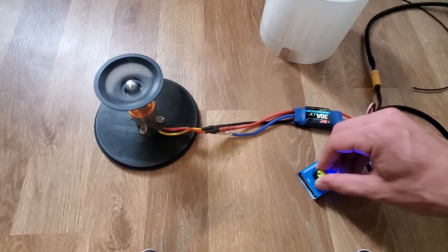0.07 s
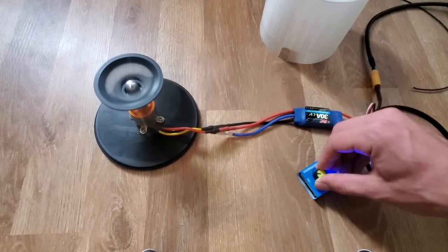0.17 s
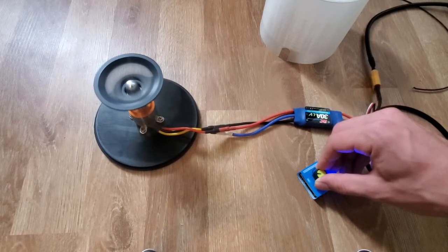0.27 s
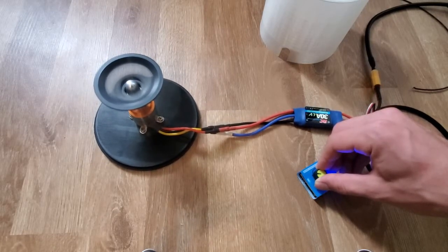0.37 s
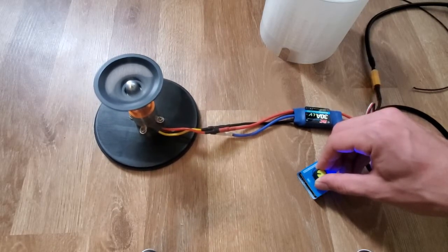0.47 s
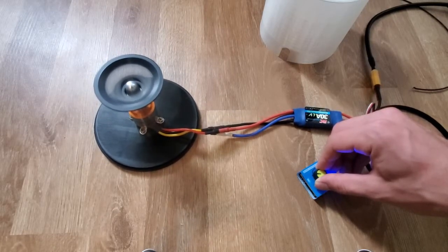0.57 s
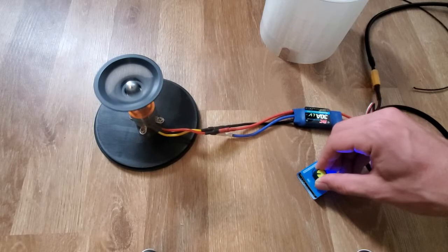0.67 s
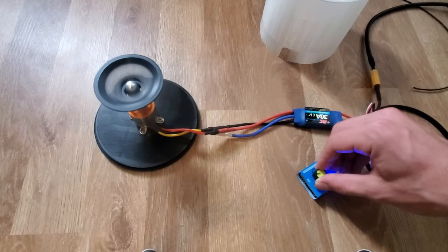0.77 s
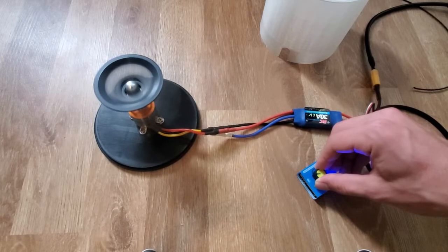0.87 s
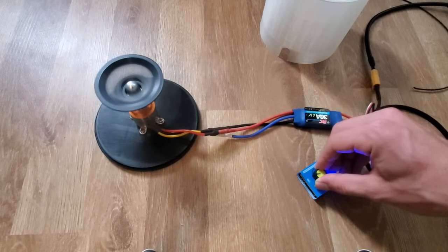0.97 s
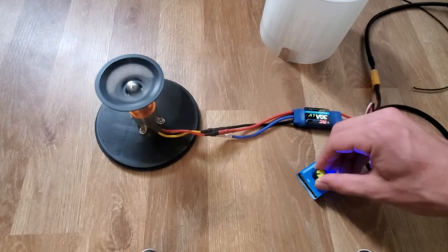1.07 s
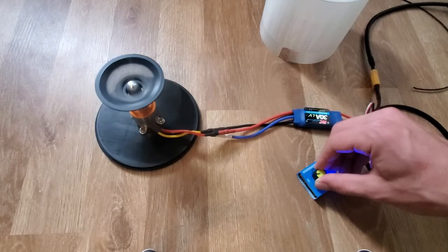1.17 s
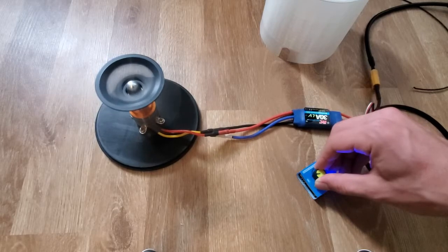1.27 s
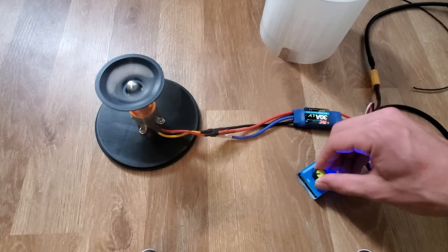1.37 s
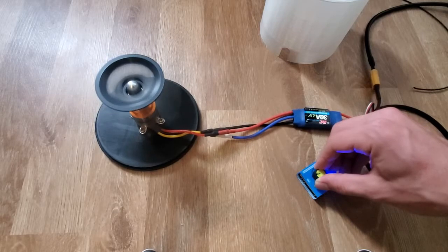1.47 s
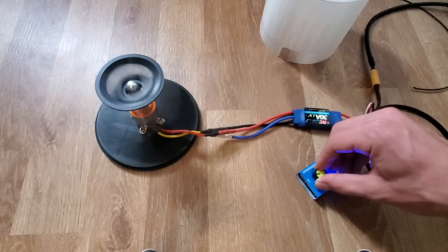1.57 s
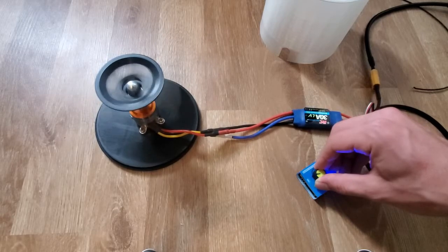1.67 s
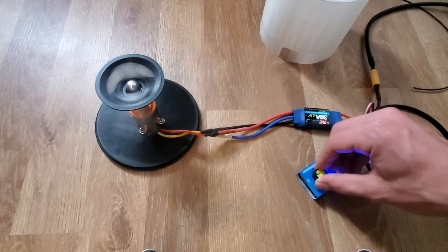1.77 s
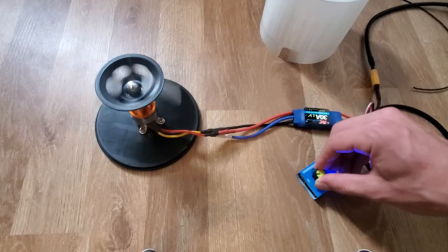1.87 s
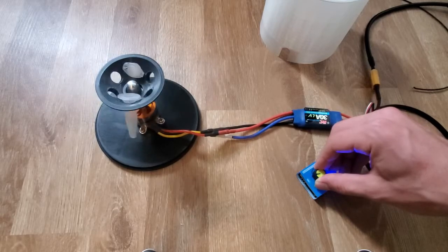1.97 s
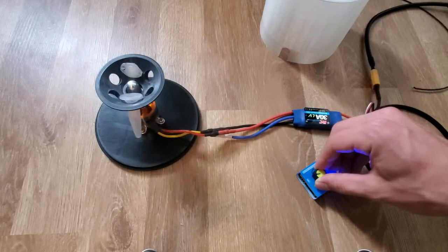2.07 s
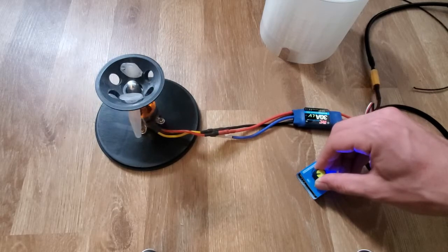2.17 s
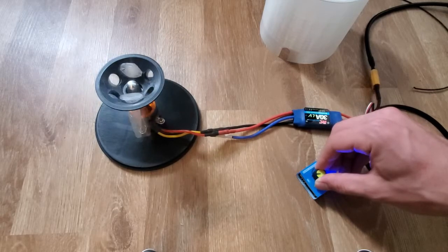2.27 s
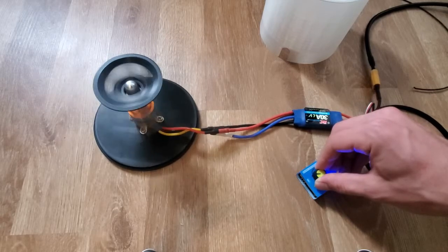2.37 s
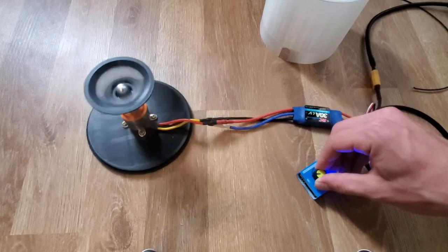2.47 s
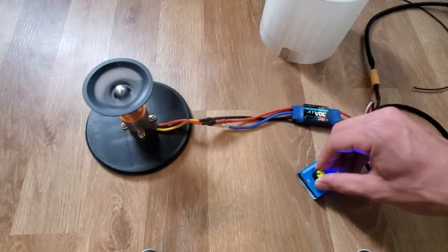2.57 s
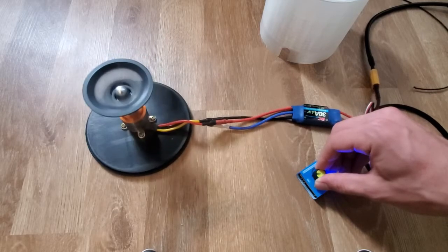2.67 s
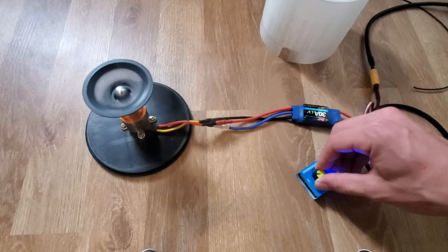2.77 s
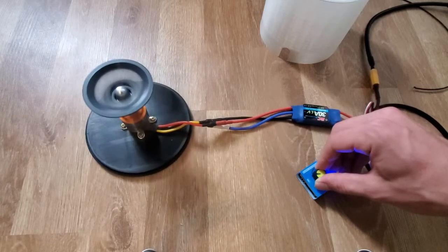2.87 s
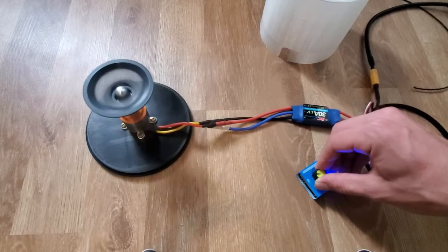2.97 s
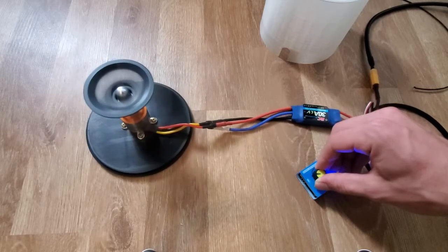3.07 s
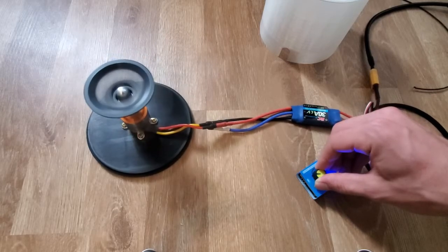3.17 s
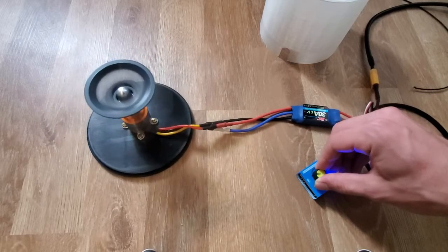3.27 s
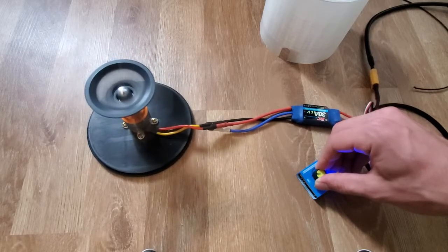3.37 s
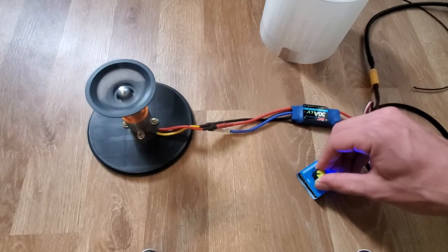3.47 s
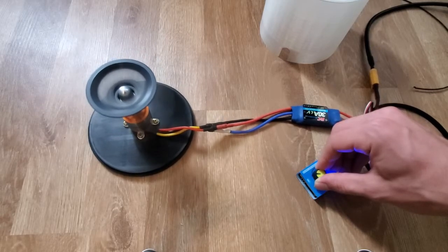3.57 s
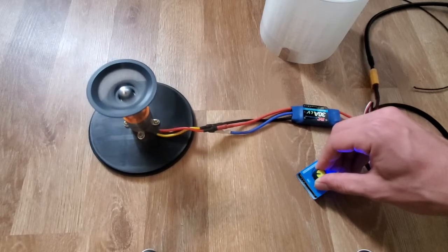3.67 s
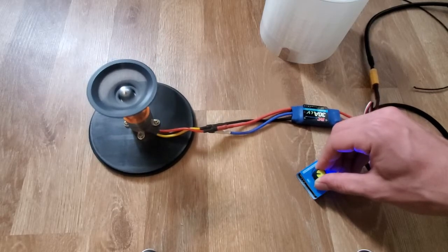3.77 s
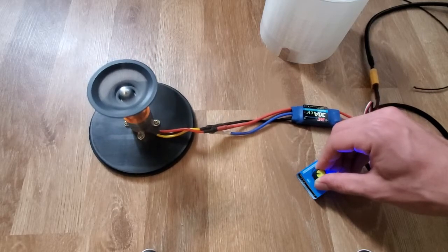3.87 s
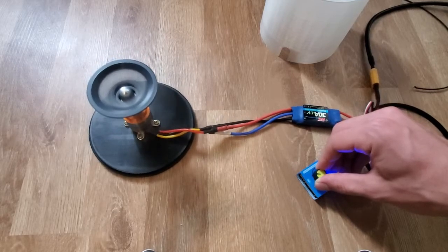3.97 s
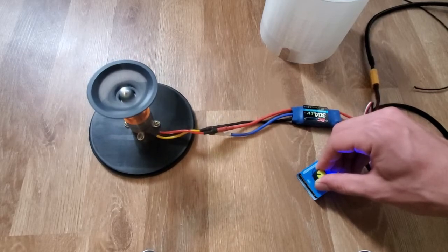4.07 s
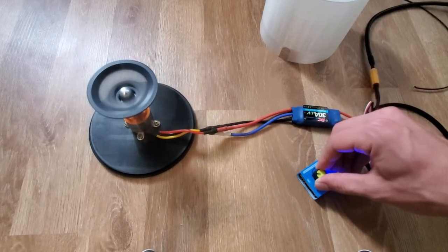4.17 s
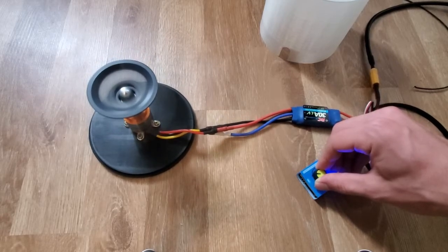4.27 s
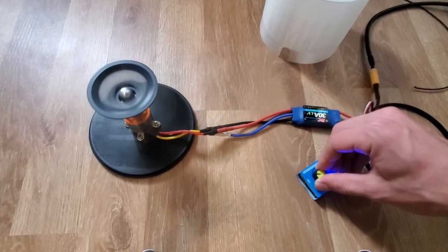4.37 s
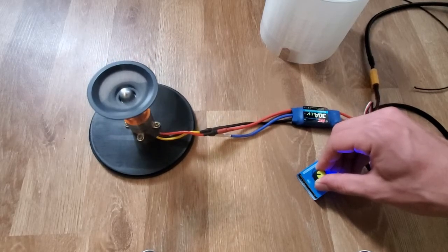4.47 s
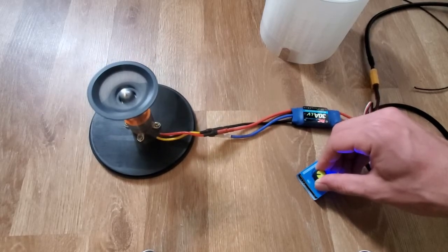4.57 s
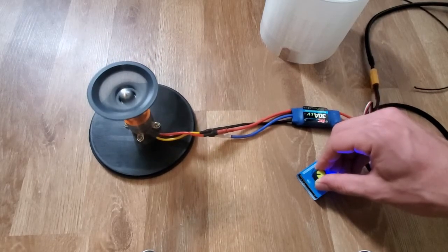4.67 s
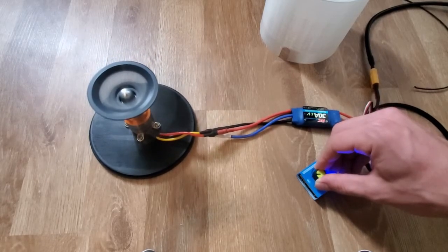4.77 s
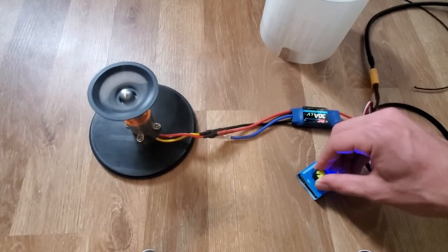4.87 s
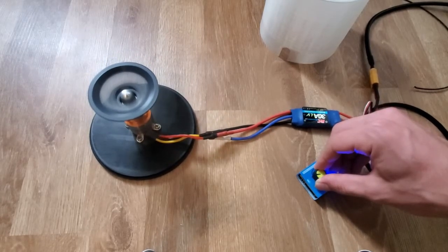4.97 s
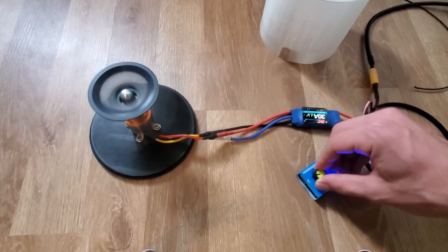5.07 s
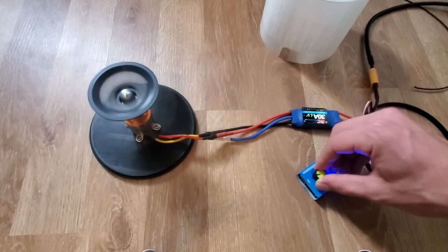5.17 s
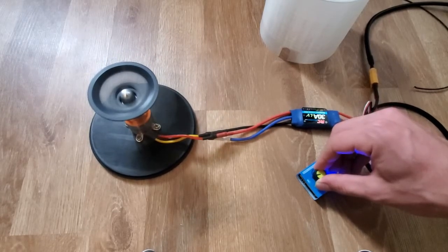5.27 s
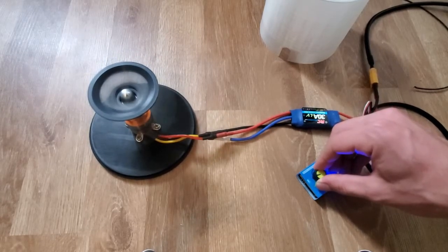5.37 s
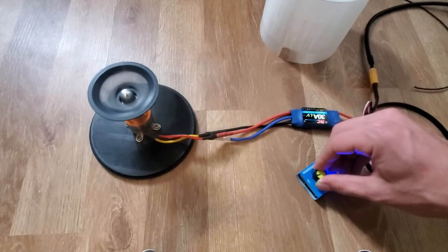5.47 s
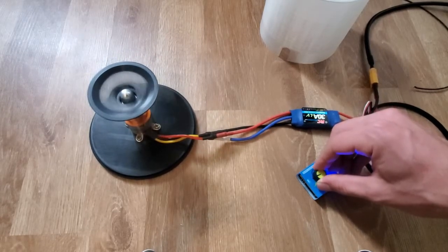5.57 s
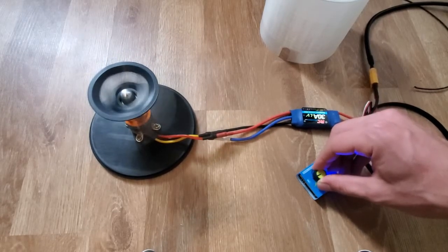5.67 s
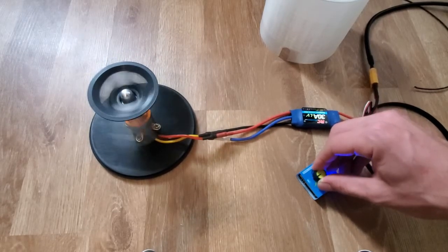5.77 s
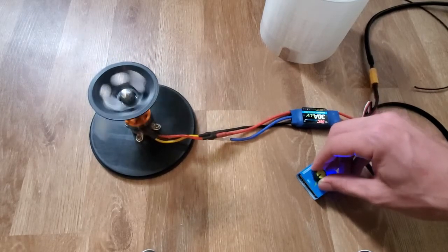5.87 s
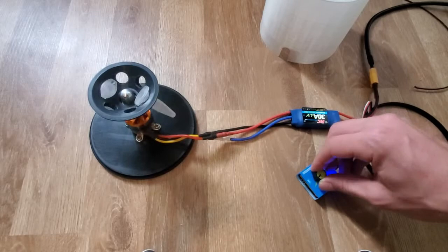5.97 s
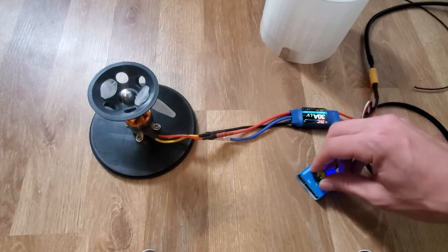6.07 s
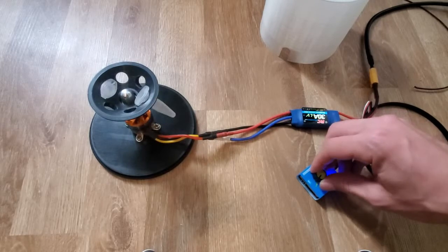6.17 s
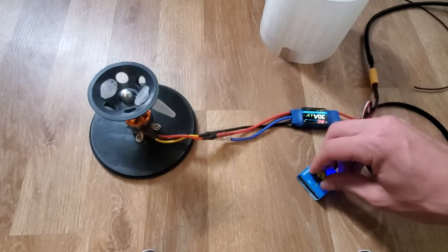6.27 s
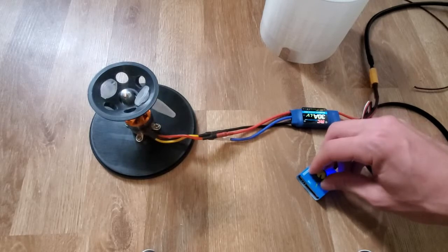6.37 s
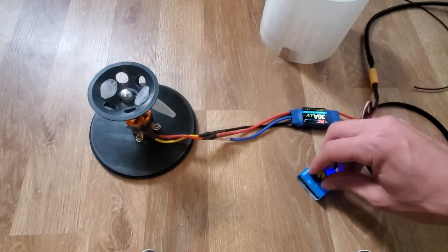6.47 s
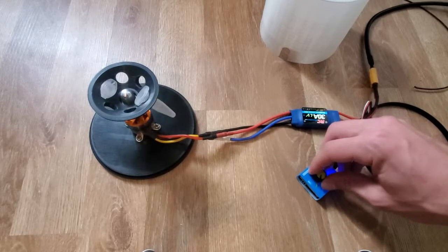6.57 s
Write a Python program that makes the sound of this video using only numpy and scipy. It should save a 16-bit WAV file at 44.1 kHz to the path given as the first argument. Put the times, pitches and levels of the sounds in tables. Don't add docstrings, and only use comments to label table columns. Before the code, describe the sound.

From 0 s a small motor is running fast on a wooden floor: a bright metallic whirr with singing bearing tones, a low unbalance hum, and a loose plastic foot rattling the boards at nearly two hundred strikes a second. A thin electronic whistle near 8 kHz, with a fainter one an octave up, rides above. The pitch eases slightly; at about 0.9 s the whistle cuts, the rattle stumbles out by 1.1 s, and the whirr slides down, duller and softer, nearly to rest by 2.2 s. At 2.3 s a harsh ringing buzz with scattered knocks kicks it back to life. From 2.6 s the whine climbs, fairly clean, with rattle returning around 3.5 s and growing strong by 4.3 s. Power stops near 4.85 s, rattling breaks up by 5.1 s, and the motor coasts down, fading into low room rumble. Left side is louder and brighter.

```python
import sys
import numpy as np
from scipy import signal
from scipy.fft import rfft, irfft, next_fast_len
from scipy.io import wavfile
from scipy.ndimage import uniform_filter1d

SR = 44100
rng = np.random.default_rng(int(sys.argv[2]) if len(sys.argv) > 2 else 0)


def master_out(mix):
    frames = np.transpose(np.atleast_2d(mix))
    ceiling = np.clip(frames, -1, 1)
    pcm = np.round(ceiling * 32767).astype(np.int16)
    wavfile.write(sys.argv[1], SR, pcm)


def level_to_linear(level):
    exponent = np.asarray(level, float) / 20
    return 10 ** exponent


N = 291942
T = np.arange(N) / SR

# [start_s, strength_db]
HOPS = [
    [(0, -23), (.24, -23), (.54, -28.5), (.57, -25), (.95, -27.5), (1.01, -40.5), (1.1, -53.5)],
    [(2.3, -89), (2.32, -40), (2.39, -53.5), (2.41, -33), (2.49, -32), (2.56, -63.5)],
    [(2.77, -41.5), (3.5, -33.5), (3.53, -30), (3.88, -26), (4.3, -24.5), (4.4, -25.5), (4.98, -27.5),
     (5.03, -40), (5.12, -64.5)],
]
# [on_s, blind_end_s, off_s]
POWERED = [
    (-1, -1, .94),
    (2.303, 2.562, 4.85),
]
# [speed_turns_per_s, unbalance_hum_db, magnet_cogging_db, clean_order_share_0_to_1]
SHAKE = [(0, -95, -93, .08), (9.9, -71.5, -56.5, .08), (30.4, -72, -45.5, .08), (55, -72.5, -40, .12),
         (78.2, -57, -39, .25), (96.8, -61, -33, .4), (135, -51, -37, .68), (155, -41, -34.5, .9),
         (163, -37.5, -51.5, .96), (210, -36, -60, .96)]


def evened(x):
    return x / np.sqrt(np.mean(x ** 2) + 1e-20)


def read(points, hz):
    f, value = np.transpose(points)
    return np.interp(np.log(hz + 1), np.log(f + 1), value)


def curve(rows, column, off=-120., t=T):
    rows = np.array(rows)
    return np.interp(t, rows[:, 0], rows[:, column], off, off)


def spells(tables, column, off=-120.):
    return np.max([curve(rows, column, off) for rows in tables], axis=0)


def between(start_s, end_s):
    return (T > start_s) & (T < end_s)


def bumps(modes, hz):
    return sum(db / (1 + (2 * (hz - f) / width) ** 2) for f, width, db in modes)


def wander(hz):
    return evened(signal.sosfilt(signal.butter(2, hz, fs=SR, output="sos"), rng.standard_normal(N)))


FLUTTER = wander(hz=9)


def line(angle_turns, flutter_db):
    flutter = level_to_linear(flutter_db * np.roll(FLUTTER, rng.integers(N)))
    return np.sqrt(2) * np.sin(2 * np.pi * (angle_turns + rng.random())) * flutter


def shaped_noise(shape_db, patchy_db):
    frames = N // 128 + 5
    re, im = rng.standard_normal((2, frames, 257)).transpose(0, 2, 1)
    patches = uniform_filter1d(rng.standard_normal((frames, 257)).T, 5, 0)
    patches = evened(uniform_filter1d(patches, 12, 1))
    bins = (re + 1j * im) * level_to_linear(shape_db + patchy_db * patches)
    return evened(signal.istft(bins, nperseg=512, noverlap=384)[1][:N])


def room():
    # [hz, db_per_hz]
    room_db = [(12, -49), (20, -8.5), (86, -12.5), (116, -2), (150, -27), (182, -22.5), (216, -27),
               (241, -32.5), (660, -50.5), (3440, -56.5), (5080, -63), (6540, -54), (7950, -76),
               (11400, -65.5), (16000, -70.5)]
    # [hz, left_right_likeness]
    room_same = [(60, 0.97), (240, 0.94), (950, 0.25), (3770, 0.14), (15000, 0.071)]
    hz = np.fft.rfftfreq(N, 1 / SR)
    a, b = rfft(rng.standard_normal((2, N)))
    same = np.clip(read(room_same, hz), -1, 1)
    pair = np.array([a, same * a + np.sqrt(1 - same ** 2) * b])
    return level_to_linear(-53) * evened(irfft(pair * level_to_linear(read(room_db, hz)), N))


def turns():
    # [start_s, speed_turns_per_s]
    throttle = [
        [(0, 196.5), (.1, 195.6), (.45, 187), (.7, 187.6), (.9, 181.3)],
        [(2.3, 0), (2.57, 126), (2.68, 143), (2.8, 156.9), (2.93, 168), (3.15, 170.2), (3.6, 184.5), (3.8, 193),
         (4, 197.5), (4.2, 199.7), (4.62, 201.8), (4.72, 200), (4.84, 190.8)],
    ]
    drag_per_s, friction_turns_per_s = 1.1, 80
    speed = spells(throttle, 1, 0)
    for rows in throttle:
        off_s, last = rows[-1]
        coast = (last + friction_turns_per_s) * np.exp(-drag_per_s * (T - off_s)) - friction_turns_per_s
        speed = np.maximum(speed, coast * (T > off_s))
    speed = speed * (1 + .001 * wander(hz=25))
    return speed, np.cumsum(speed) / SR


def controller(speed, angle):
    half_orders = (0, 7, -7, 10.74, 21, .5, -.5, 1)
    half_db = (-2, 0, -3, -20, -19, -13, -14, -15)
    full_orders = (0, -7, -21, -28, .5, 1, -1, -1.5)
    full_db = (0, -12, -23, -22, -9, -10, -12, -14)
    # [time_from_its_end_s, full_rate_switching_db, housing_ring_db]
    blind_start = [(-.257, -42, -49), (-.2, -34, -26), (-.11, -28, -35), (-.007, -28, -23.5),
                   (.003, -54.5, -24.5), (.09, -76, -26.5), (.24, -86.5, -49.5)]
    power_db = (0.7, 1.4)
    carrier_hz, sag_hz_per_turn, blind_hz = 7807, .43, 12
    close_s, close_db = 0.22, -5.5

    blind = sum(between(on, locked) for on, locked, _ in POWERED)
    carrier = np.cumsum(carrier_hz - sag_hz_per_turn * speed + blind_hz * blind) / SR
    half = sum(level_to_linear(db) * line(carrier + k * angle, flutter_db=.5) for k, db in zip(half_orders, half_db))
    full = sum(level_to_linear(db) * line(2 * carrier + k * angle, flutter_db=1) for k, db in zip(full_orders, full_db))
    full += level_to_linear(-8.5) * wander(hz=200) * np.cos(4 * np.pi * carrier)
    ring = wander(hz=110) * np.cos(2 * np.pi * 4400 * T)

    run = 0
    for (_, locked, off), db in zip(POWERED, power_db):
        closing = np.clip(1 - (off - T) / close_s, 0, 1)
        run = run + between(locked, off) * level_to_linear(db + close_db * closing)
    switching, kick = (sum(level_to_linear(curve(blind_start, k, t=T - locked)) for _, locked, _ in POWERED)
                       for k in (1, 2))
    half *= run * level_to_linear(-36.5 - 0.039 * (speed - 169))
    full *= run * level_to_linear(-37 - .1 * (speed - 168)) + switching
    return half + full + kick * ring


def hums(speed, angle):
    cog_orders = (6, 6.5, 7, 7.5, 14, 21, 28)
    cog_db = (-8, -1, 0, -12, -15, -11, -13)
    bloom_hz, bloom_width_hz = 763, 183
    hz = np.fft.rfftfreq(512, 1 / SR)[:, None]
    rumble = shaped_noise(-14. * np.log2(hz / 150 + .01) ** 2, patchy_db=1.0)
    rumble = signal.sosfilt(signal.butter(4, 55, "high", fs=SR, output="sos"), rumble)
    shake = line(angle, flutter_db=0.0) + level_to_linear(-10.5) * line(angle / 2, flutter_db=2.5) + level_to_linear(-4.5) * rumble
    hum = level_to_linear(curve(SHAKE, 1, t=speed)) * shake

    cogs = 0
    for k, db in zip(cog_orders, cog_db):
        bloom = 1 / (1 + ((k * speed - bloom_hz) / bloom_width_hz) ** 6)
        cogs = cogs + level_to_linear(db) * bloom * line(k * angle, flutter_db=1.5)
    murmur = shaped_noise(-60. * np.log2(hz / 680 + 0.03) ** 2, patchy_db=7.0)
    cogs = cogs / np.sqrt(uniform_filter1d(cogs ** 2, 4000) + 1) + .3 * murmur
    return hum + level_to_linear(curve(SHAKE, 2, t=speed)) * cogs


def hop_db():
    return uniform_filter1d(np.maximum(spells(HOPS, 1), -120), size=200)


def per_spell(values):
    return sum(v * between(rows[0][0], rows[-1][0]) for rows, v in zip(HOPS, values))


def rattle(angle):
    # [start_s, end_s, extra_scatter_turns, stray_strikes_per_s]
    stumbles = [(0.441, 0.527, 0.23, 40), (0.943, 1.122, 0.28, 60), (2.292, 2.377, 0.64, 230),
                (2.371, 2.558, 0.53, 630), (2.77, 3.475, 0.037, 5), (3.471, 3.595, .3, 60),
                (3.654, 3.75, .07, 10), (3.858, 3.911, 0.15, 30), (4.397, 5.118, .3, 60)]
    # [hz, width_hz, level_db]
    boards = [(288, 73, -10.5), (440.6, 110, -10.5), (471, 96, -2.5), (584.7, 142.6, 4), (700, 98, -6.5),
              (814.5, 250, -18), (936, 20, -33), (1403, 160, -19.5), (1516, 98, -18.5), (1815, 450, -16.5),
              (2038, 290, -23)]
    weak_hop = (.38, .55, .5)
    thud_db = (-8, -9, -2)
    scatter_turns, thud_hz, thin_hz = .018, 462.6, 260

    scatter = scatter_turns + sum(extra * between(a, b) for a, b, extra, _ in stumbles)
    strays_per_s = sum(rate * between(a, b) for a, b, _, rate in stumbles)
    at = np.flatnonzero(np.diff(np.floor(angle)) > 0)
    late, size = rng.standard_normal((len(at), 2)).T
    weak = np.where(np.arange(len(at)) % 2, per_spell(weak_hop)[at], 1)
    blows = (rng.random(N) < strays_per_s / SR) * rng.random(N)
    struck = np.clip(at + (scatter[at] * late * np.gradient(at)).astype(int), 0, N - 1)
    np.add.at(blows, struck, weak * level_to_linear((1 + 6 * scatter[at]) * size))

    t = np.arange(2000) / SR
    ring = 0
    for hz, width, db in boards:
        swell = width ** 2 * t * np.exp(-np.pi * width * t)
        ring = ring + level_to_linear(db) * swell * np.sin(2 * np.pi * (hz * t + rng.random()))
    knock = signal.oaconvolve(blows, ring)[:N]
    knock = signal.sosfilt(signal.butter(3, thin_hz, "high", fs=SR, output="sos"), knock)
    thud = signal.sosfiltfilt(signal.butter(3, thud_hz, fs=SR, output="sos"), knock)
    knock = knock + thud * (level_to_linear(per_spell(thud_db)) - 1)
    tick = signal.oaconvolve(blows, np.exp(-t[:900] / .004))[:N] * np.diff(rng.standard_normal(N + 1))
    steady = np.sqrt(uniform_filter1d(knock ** 2, 2600) + 1e-2 * np.mean(knock ** 2))
    strike = (knock + level_to_linear(-21.5) * evened(tick) * np.std(knock)) / steady
    return level_to_linear(hop_db() + 6.5) * strike


def housing_db(hz):
    # [hz, db_per_hz]
    housing = [(500, -13), (850, -16), (1490, -17), (2130, -21), (2750, -2), (2820, -2.5), (3120, -4),
               (3210, -5), (3820, -5.5), (4230, -2), (4890, -9.5), (5080, -12.5), (6560, -8), (7330, -21),
               (7600, -22), (9880, -21.5), (16700, -120)]
    # [hz, width_hz, level_db]
    housing_modes = [(2760, 1500, 0.5), (3787, 400, 4.5), (4295, 130, 5), (4927, 51, -7), (5480, 930, -1)]
    return read(housing, hz) + bumps(housing_modes, hz)


def order_db(hz):
    return .8 * housing_db(hz) + bumps([(4530, 130, 7)], hz) - 10 / (1 + (4950 / (hz + 1)) ** 30)


def clean_orders(speed, angle, hop):
    bearing_orders = [2.147 * k for k in range(5, 14)]
    magnet_orders = [7, 14, 16.2, 24.6, 27, 28]
    levels_db = (-8, -15, -3, 1, 2, -12, -4, -2, -3, -13, -16, -13, -11, -11, -5)
    rocking_orders = (18.5, 21)
    rocking_db = (-14, -9)
    hop_lift_db = 9
    clean = 0
    for k, db in zip(bearing_orders + magnet_orders, levels_db):
        clean = clean + level_to_linear(db + order_db(k * speed)) * line(k * angle, flutter_db=1.5)
    for k, db in zip(rocking_orders, rocking_db):
        level = level_to_linear(db + hop_lift_db * hop + order_db(k * speed))
        clean = clean + level * line(k * angle, flutter_db=1.5)
    return clean / np.sqrt(uniform_filter1d(clean ** 2, 16000) + 0.06)


def whirr(speed, angle):
    # [hz, db_per_hz]
    air_shape = [(4240, -45), (7200, -10), (7390, -15), (7470, -15), (8000, -19), (8080, -7), (10200, -11),
                 (11100, -21.5), (14600, -12), (15000, -6), (15800, -25.5)]
    # [hz, width_hz, level_db]
    coasting = [(1100, 2500, -6.5), (2100, 620, 18.5), (2980, 250, 11), (3200, 130, -6.5),
                (4230, 360, -1.5), (5220, 900, -14.5)]
    # [speed_turns_per_s, whirr_db, air_hiss_db]
    driven = [(0, -84, -65), (12, -46, -60), (25.6, -48, -52.5), (55, -34, -51), (117.2, -33.5, -54),
              (139, -31.5, -45.5), (153.6, -28.5, -48.5), (206.2, -28.5, -49.5)]
    free = [(0, -100, -100), (11, -84.5, -97), (50.2, -52, -84), (75, -44, -78.5), (111, -37.5, -74),
            (135, -34.5, -66), (166.3, -32, -60), (206.5, -26.5, -52.5)]
    hop_blur = 0.36

    hz = np.fft.rfftfreq(512, 1 / SR)[:, None]
    frame_s = np.arange(N // 128 + 5) * 128 / SR
    slow = 1 - np.interp(frame_s, T, speed) / 200
    octaves = np.log2(hz / 3500 + 0.0038)
    dulling_db = slow * (0.73 * octaves + (7.3 + 38.0 * slow) * np.maximum(octaves - .35, 0))
    colour_db = abs(slow) ** 2.4 * bumps(coasting, hz)
    rolling = shaped_noise(housing_db(hz) - dulling_db + colour_db, patchy_db=0.5)
    rolling /= np.sqrt(uniform_filter1d(rolling ** 2, 8000) + 1e-3)
    rolling *= 1 + 0.29 * np.cos(2 * np.pi * angle)

    hop = level_to_linear(hop_db() + 24.5)
    clean = clean_orders(speed, angle, hop)
    share = np.clip(curve(SHAKE, 3, t=speed) - hop_blur * hop, 0, .99)
    body = np.sqrt(1 - share ** 2) * rolling + share * clean
    top_db = 13.0 * slow / (1 + ((hz - 14600) / 900) ** 2)
    air = shaped_noise(read(air_shape, hz) + top_db, patchy_db=2.5)

    on = uniform_filter1d(1. * sum(between(a, b) for a, _, b in POWERED), size=300)
    body_db, air_db = (on * curve(driven, k, t=speed) + (1 - on) * curve(free, k, t=speed) for k in (1, 2))
    return level_to_linear(body_db + 6.0) * body + level_to_linear(air_db + 11.5 + 3.1 * hop) * air


def ports(x):
    # [hz, left_right_likeness]
    port_same = [(100, .92), (600, .92), (1500, .65), (2800, .62), (5000, .6), (9000, .5), (15000, .8)]
    # [hz, left_over_right_db]
    left_louder = [(60, 1.5), (120, 2.5), (240, 2.0), (480, 6.0), (950, 3.0), (1890, 8.0), (3770, 8.0),
                   (7520, 7.0), (15000, 12.0)]
    delay_s, echo_decay_s = 0.00018, .05
    size = next_fast_len(N + 8000)
    hz = np.fft.rfftfreq(size, 1 / SR)
    same = np.clip(read(port_same, hz), 0, 1)
    echoes = rng.standard_normal(8000) * np.exp(-np.arange(8000) / SR / echo_decay_s)
    reflected = rfft(echoes / np.linalg.norm(echoes), size)
    late = same * np.exp(-2j * np.pi * hz * delay_s) + np.sqrt(1 - same ** 2) * reflected
    left = rfft(x, size) * level_to_linear(bumps([(6900, 170, -1.0)], hz))
    right = left * late * level_to_linear(-.5 - read(left_louder, hz))
    return irfft(np.array([left, right]), size)[:, :N]


def scene():
    speed, angle = turns()
    motor = whirr(speed, angle) + rattle(angle) + hums(speed, angle) + controller(speed, angle)
    return ports(motor) + room()


def low_pass(x):
    return signal.sosfilt(signal.butter(12, 16760, fs=SR, output="sos"), x)


def record(dry):
    dry = signal.sosfilt(signal.butter(4, 32, "high", fs=SR, output="sos"), dry)
    edge = signal.firwin(511, 15750, window=("kaiser", 9), fs=SR)
    mix = signal.oaconvolve(dry, edge[None], "same", axes=1)
    return low_pass(mix)


dry = scene()
out = record(dry)
master_out(out)
```